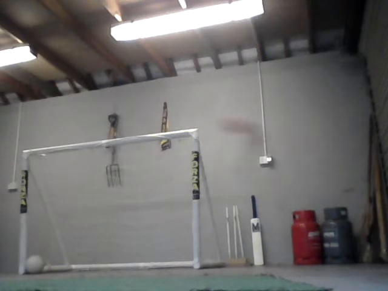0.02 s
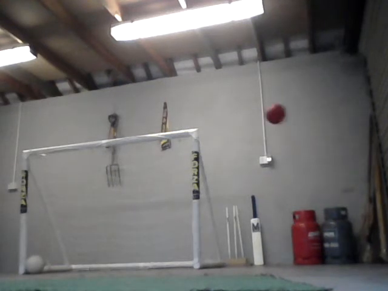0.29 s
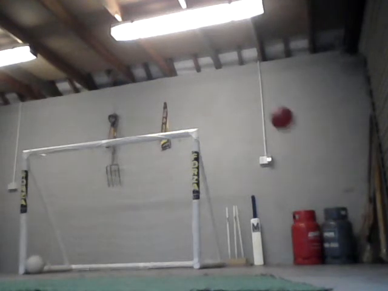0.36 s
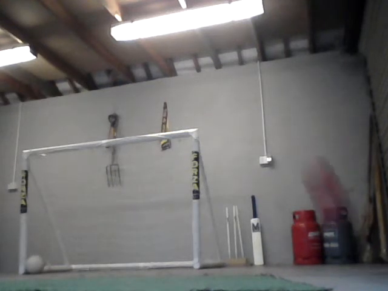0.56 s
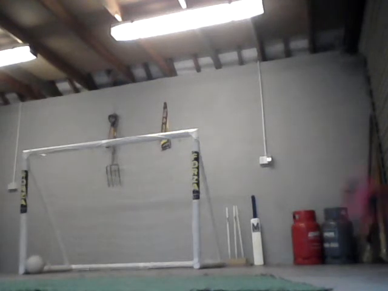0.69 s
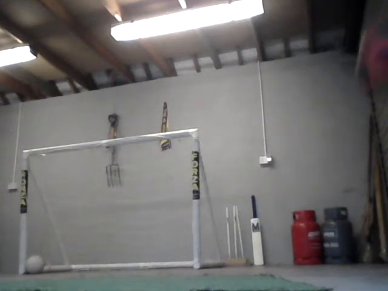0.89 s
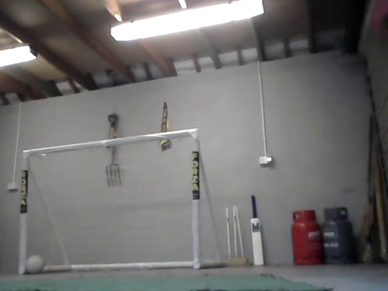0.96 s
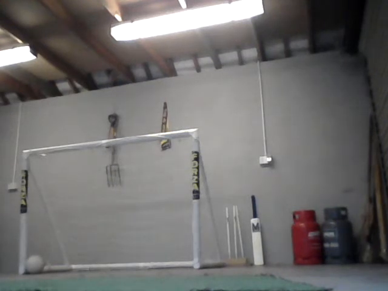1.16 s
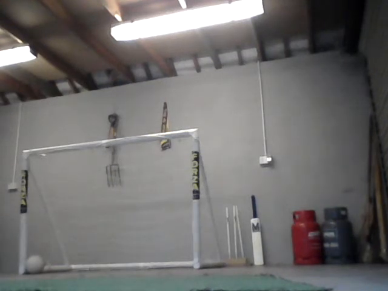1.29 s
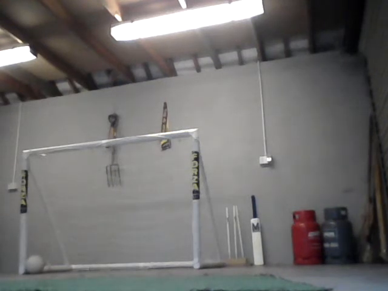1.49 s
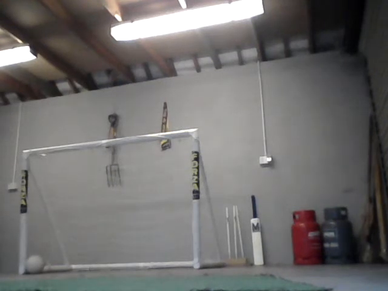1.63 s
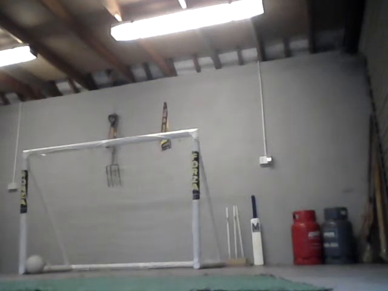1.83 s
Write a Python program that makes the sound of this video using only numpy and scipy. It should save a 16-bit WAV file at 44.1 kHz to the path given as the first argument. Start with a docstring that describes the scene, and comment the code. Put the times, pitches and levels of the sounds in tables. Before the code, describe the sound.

A ball cracks against a plastic crossbar and the goal frame rings briefly. It then bounces twice close by, each a sharp slap with a low thump, echoing in a bare garage. Shoes scuff the concrete after each bounce.

```python
"""Ball off a crossbar in a garage.

As the echo of a kick dies in a bare garage, the ball cracks against the plastic crossbar of a
small goal and the frame rings. It bounces twice close by, each time a sharp slap of the shell and
a low thump. Shoes scuff the concrete after each bounce; something small is tapped near the end."""
import sys
import numpy as np
from scipy import signal
from scipy.io import wavfile

SR = 44100
rng = np.random.default_rng(int(sys.argv[2]) if len(sys.argv) > 2 else 0)


def int16_out(signal):
    """Quantize to a 16-bit WAV file."""
    q = np.round(np.clip(np.atleast_2d(signal).T, -1, 1) * 32767)
    wavfile.write(sys.argv[1], SR, q.astype(np.int16))


N = 81585
T = np.arange(N) / SR


def amp(db):
    """Decibels to gain."""
    return 10 ** (np.asarray(db) / 20)


def interp_log(points, hz):
    """Table value at hz, on a log-frequency axis."""
    table_hz, value = np.transpose(points)
    return np.interp(np.log(hz + 1), np.log(table_hz), value)


def decay(t60_s, t=T):
    """Envelope falling 60 dB in t60_s."""
    return np.exp(-np.log(1000) * t / t60_s)


def unit_energy(x):
    """Scale to an energy of one."""
    return x / np.sqrt(np.sum(x ** 2) + 1e-20)


def delayed(x, delay_s):
    """Delay, cut to N samples."""
    return np.concatenate([np.zeros(max(round(delay_s * SR), 0)), x])[:N]


def colour(x, spectrum, size=8192):
    """Minimum-phase filter with the given spectrum."""
    hz = abs(np.fft.fftfreq(size, 1 / SR))
    log_gain = np.log(amp(interp_log(spectrum, hz)))
    response = np.exp(np.conj(signal.hilbert(log_gain)))
    taps = np.fft.ifft(response).real[:size // 2]
    return signal.fftconvolve(x, taps)[:N]


def burst(t60_s):
    """Dense, short-lived resonances as decaying noise."""
    return unit_energy(rng.standard_normal(N) * decay(t60_s))


def ring(modes, rise_s):
    """Decaying modes with a gradual onset."""
    tones = sum(amp(db) * decay(t60_s) * np.sin(2 * np.pi * hz * T) for hz, db, t60_s in modes)
    return (1 - np.exp(-T / rise_s)) * tones


# (frequency [Hz], gain [dB])
ROOM_TONE_SPECTRUM = [(25, -22), (60, 0.5), (110, -3.5), (220, -6), (500, -19.5), (1000, -15),
                      (2000, -31.5), (6000, -25), (9000, -28), (14000, 3.5)]


def room_tone(level_db=-39.5):
    """Faint, steady noise."""
    return amp(level_db) * colour(rng.standard_normal(N), ROOM_TONE_SPECTRUM)


# (frequency [Hz], T60 [s])
GARAGE_DECAY = [(50, .72), (130, 0.56), (400, 0.67), (900, 0.63), (2400, 0.64), (5000, 0.61), (6500, 0.51),
                (9000, 0.37), (14000, 0.37)]


def garage_echo(rise_s=.004, size=512):
    """Impulse response: dense reflections, each band dying at its own rate."""
    hz, t, bands = signal.stft(rng.standard_normal(N), SR, nperseg=size)
    t60_s = interp_log(GARAGE_DECAY, hz)[:, None]
    tail = signal.istft(bands * decay(t60_s, t), SR, nperseg=size)[1][:N]
    return unit_energy(tail * (1 - np.exp(-T / rise_s)))


# (frequency [Hz], level [dB], T60 [s])
GARAGE_MODES = [(71, -1, 0.99), (81, 4, 0.87)]


def garage_boom():
    """Low room modes swell and linger."""
    return ring(GARAGE_MODES, rise_s=.052)


# (frequency [Hz], gain [dB])
KICK_SPECTRUM = [(30, -1.5), (70, 16), (110, 2), (160, 13), (220, -2), (310, 9), (400, 0), (700, 0.5),
                 (900, -13.5), (1700, -13), (3000, -19.5), (6000, -16.5), (14000, -29.5)]


def kick_echo(ago_s=.04):
    """Tail of a kick made just before the start."""
    echo = colour(garage_echo(), KICK_SPECTRUM)
    return echo[np.minimum(np.arange(N) + round(ago_s * SR), N - 1)]


# (frequency [Hz], gain [dB])
TAP_SPECTRUM = [(1000, -34), (4500, -20), (5500, -6), (6300, -11), (9000, -13), (14000, -17)]


def tap(start_s=1.712):
    """Something small and light is knocked."""
    return delayed(colour(burst(t60_s=.06), TAP_SPECTRUM), start_s)


# (frequency [Hz], gain [dB])
SCUFF_SPECTRUM = [(100, -28), (600, -20), (1000, -1.5), (1700, -11.5), (2100, -7.5), (2600, -6), (3500, -5),
                  (5700, -1), (7000, -1), (10000, 3), (14000, 8)]
# (time [s], length [s], direct level [dB], echo level [dB], high-pass [Hz])
SCUFFS = [(1.323, 0.015, -8.5, 0.5, 4000), (1.331, .014, -27, -9.5, 1560), (1.349, 0.009, -19, -7, 2400),
          (1.768, 0.042, 1.5, -9, 2920), (1.794, 0.014, -1.5, 0, 1700)]


def scuff(start_s, length_s, direct_db, echo_db, highpass_hz, grain_db=4):
    """A sole slips on concrete: a short swell of thin, gritty noise and its echo."""
    grit = rng.standard_normal(N) * amp(grain_db * np.minimum(rng.exponential(1, N), 4))
    slip = unit_energy(grit * np.sin(np.pi * np.minimum(T / length_s, 1)))
    echo = unit_energy(signal.fftconvolve(slip, garage_echo())[:N])
    highpass = signal.butter(2, highpass_hz, "high", fs=SR)
    thin = signal.lfilter(*highpass, amp(direct_db) * slip + amp(echo_db) * echo)
    return delayed(colour(thin, SCUFF_SPECTRUM), start_s)


def thump(hz, level_db, peak_s=.0096):
    """A few low cycles as the ball squashes and springs back."""
    age = T / peak_s
    return amp(level_db) * age * np.exp(1 - age) * np.sin(2 * np.pi * hz * T)


# First bounce (frequency [Hz], gain [dB])
HARD_SLAP = [(30, 11), (80, 26), (130, 11.5), (200, 16.5), (290, 18), (400, 15.5), (700, 17), (1050, 5.5),
             (1400, 11.5), (1800, 3.5), (2200, 10), (3400, 4.5), (5500, 7), (8000, 10.5), (14000, 15.5)]
# Second bounce (frequency [Hz], gain [dB])
LIGHT_SLAP = [(30, 19), (80, 11.5), (150, 19), (300, 14), (480, 19.5), (620, 16.5), (830, 12.5), (1100, 7),
              (1400, 10.5), (1800, 4), (2200, 10), (3400, 7), (5300, 5.5), (6500, 11), (14000, 16)]
# (time [s], slap spectrum, click [dB], shell ring [dB], rebound delay [s], rebound [dB], echo [dB],
#  knock [Hz], knock [dB], thump [Hz], thump [dB], boom [dB])
BOUNCES = [(.785, HARD_SLAP, -1.5, -8, .0019, -3.5, 2, 255, -18, 90, -18.5, -40),
           (1.5654, LIGHT_SLAP, -1, -5, .0005, -5, -4, 890, -14, 80, -20, -35)]


def bounce(start_s, spectrum, click_db, shell_db, rebound_s, rebound_db, echo_db,
           knock_hz, knock_db, thump_hz, thump_db, boom_db, knock_cycles=1.9):
    """Ball on wall or floor: slap, snap as the shell springs back, knock, thump and the room's answer."""
    impact = amp(click_db) * (T == 0) + amp(shell_db) * burst(t60_s=.024)
    rebound = amp(rebound_db) * delayed(burst(t60_s=.012), rebound_s)
    slap = colour(impact + rebound + amp(echo_db) * garage_echo(), spectrum)
    knock = amp(knock_db) * np.exp(-knock_hz * T / knock_cycles) * np.sin(2 * np.pi * knock_hz * T)
    lows = thump(thump_hz, thump_db) + amp(boom_db) * garage_boom()
    return delayed(lows - slap - knock, start_s)


# (frequency [Hz], gain [dB])
CRACK_SPECTRUM = [(30, 14.5), (90, 35.5), (240, 24.5), (350, 25.5), (470, 31.5), (720, 25.5), (900, 18.5),
                  (1350, 22.5), (2200, 19), (3400, 17), (5000, 17.5), (6500, 22), (9000, 16), (14000, 30.5)]
# (frequency [Hz], level [dB], T60 [s])
GOAL_FRAME_MODES = [(97, -20, .3), (189, -19, .25), (282, -21, .25), (425, -23, .42), (443, -12, .29),
                    (491, -17, .24), (515, -30, .62), (670, -17, .14), (721, -27, .47), (745, -18, .22),
                    (1283, -31, .25), (1367, -33, .35), (1464, -24, .4), (1497, -30, .3), (1620, -33, .3),
                    (4469, -32, .22), (4828, -32, .33), (5660, -35, .42), (6020, -34, .37),
                    (6407, -30, .38)]


def crossbar(start_s=.2108, click_db=-16, rattle_db=-6.5, echo_db=-.5):
    """The ball cracks on the bar; the joints rattle and the frame rings."""
    impact = amp(click_db) * (T == 0) + amp(rattle_db) * burst(t60_s=.06)
    crack = colour(impact + amp(echo_db) * garage_echo(), CRACK_SPECTRUM)
    frame = ring(GOAL_FRAME_MODES, rise_s=.009)
    return delayed(crack + frame + thump(hz=101.3, level_db=-13.5), start_s)


def scene():
    """Mono mix of all sources."""
    air = room_tone()
    ball = kick_echo() + crossbar() + sum(bounce(*row) for row in BOUNCES)
    return (air + ball + tap() + sum(scuff(*row) for row in SCUFFS))[None]


# (frequency [Hz], gain [dB])
MIC_RESPONSE = [(20, -18.5), (40, -2.5), (3500, 0), (5000, 3), (6000, 5.5), (6600, 3), (7200, -8.5),
                (8000, -18.5), (10000, -28.5), (15000, -53)]


def record(dry, ceiling=2.2, cutoff_hz=15500):
    """Small microphone: presence peak, soft overload, band limit."""
    saturated = ceiling * np.tanh(colour(dry[0], MIC_RESPONSE) / ceiling)
    lowpass = signal.firwin(255, cutoff_hz, window=("kaiser", 8), fs=SR)
    return signal.fftconvolve(saturated, lowpass, "same")[None]


dry = scene()
out = record(dry)
int16_out(out)
```